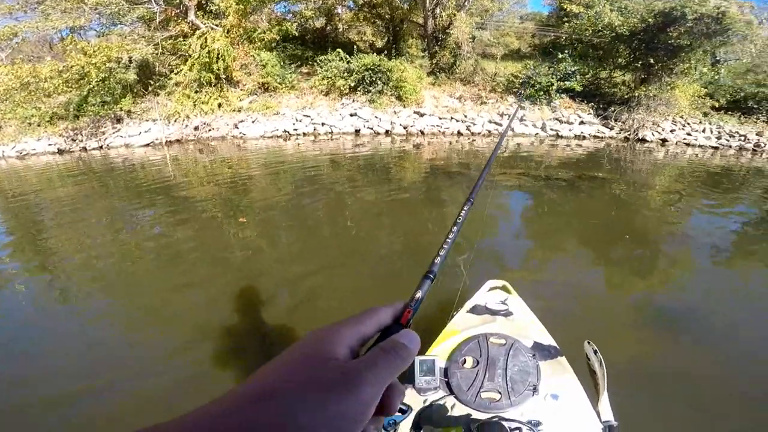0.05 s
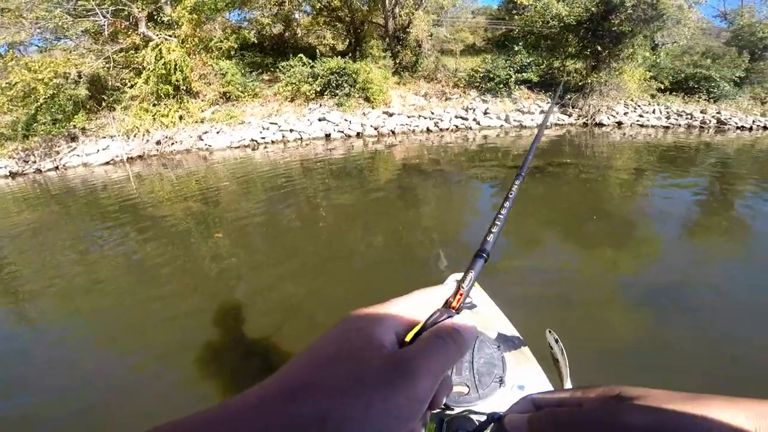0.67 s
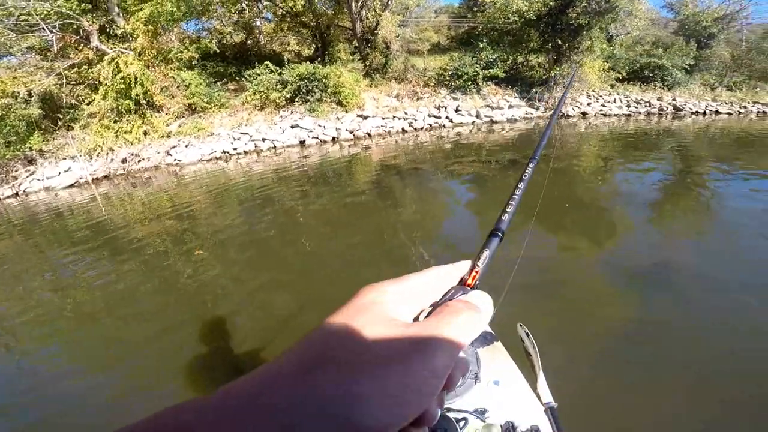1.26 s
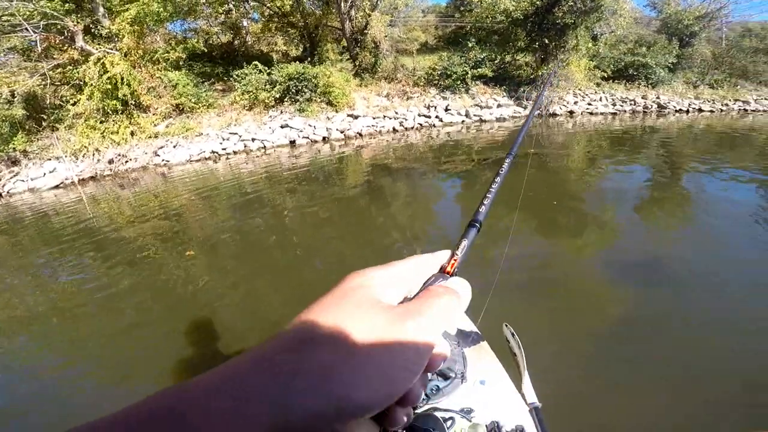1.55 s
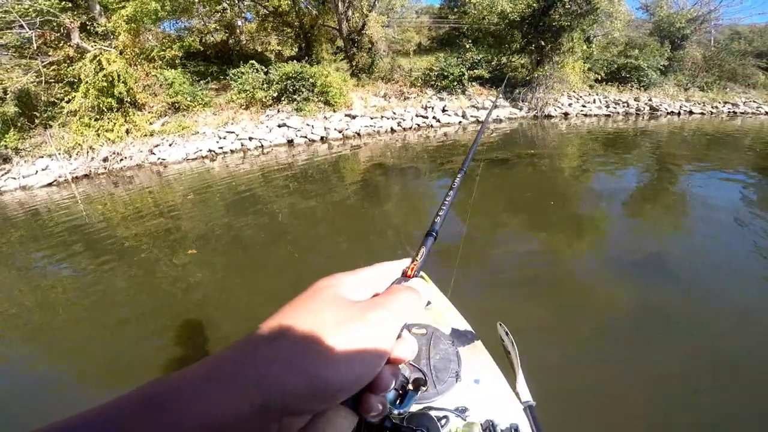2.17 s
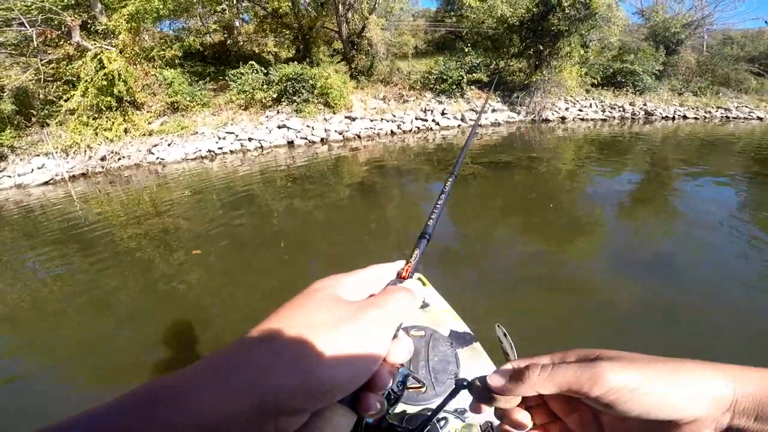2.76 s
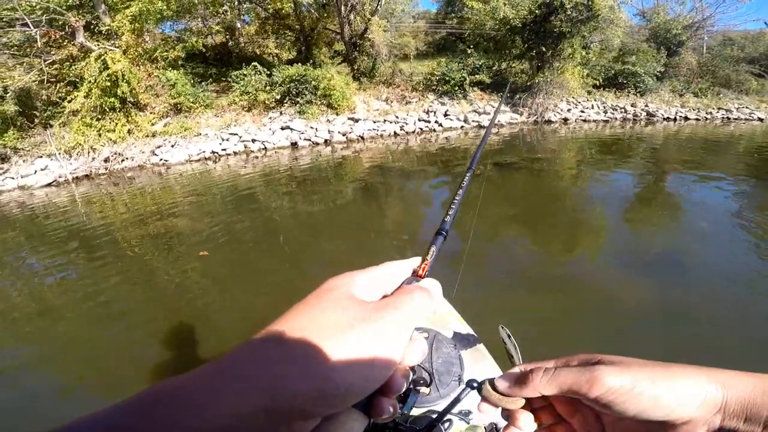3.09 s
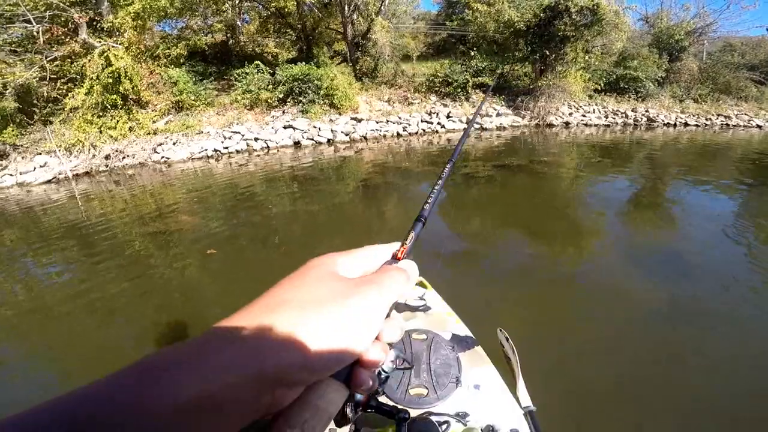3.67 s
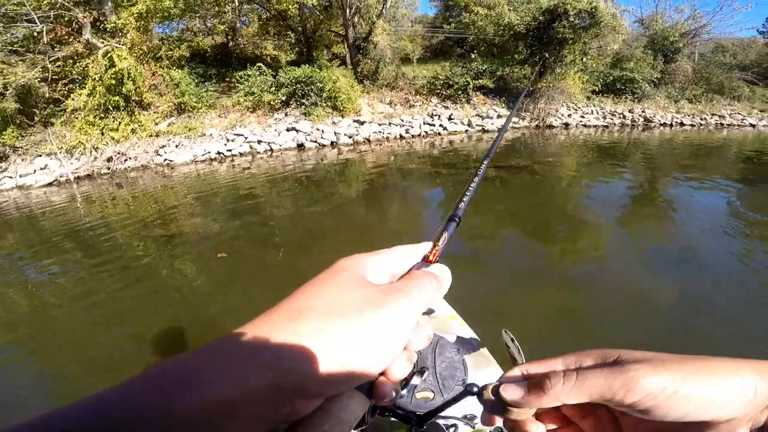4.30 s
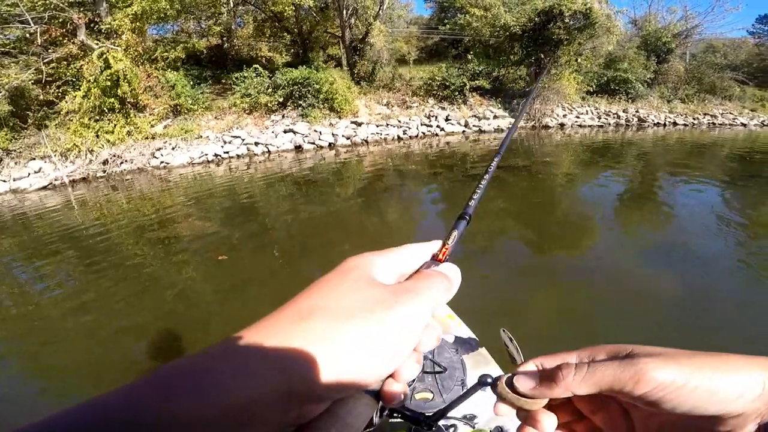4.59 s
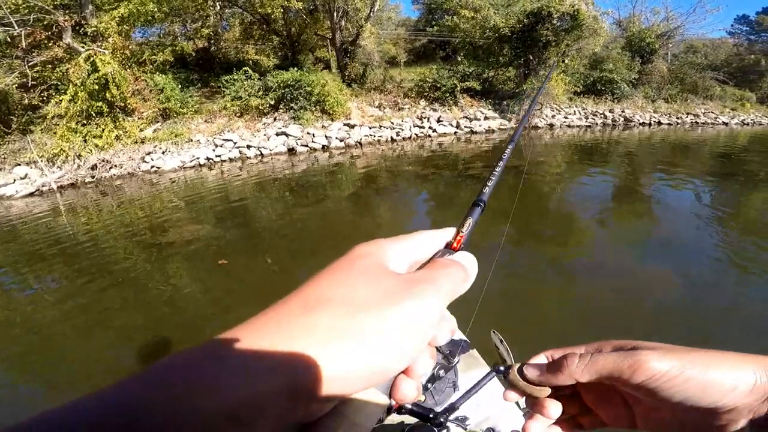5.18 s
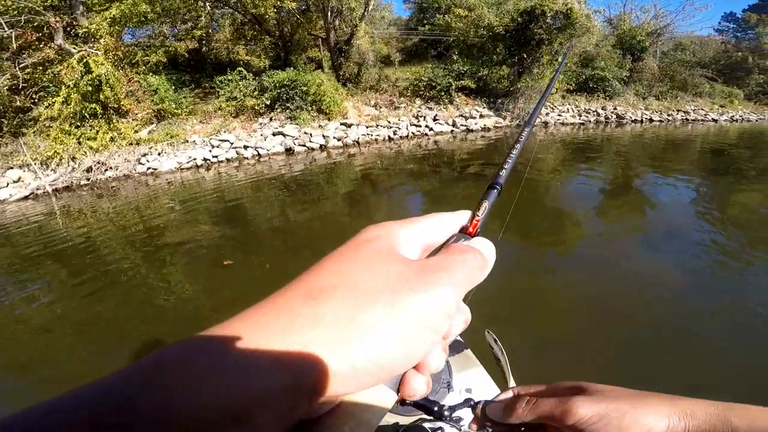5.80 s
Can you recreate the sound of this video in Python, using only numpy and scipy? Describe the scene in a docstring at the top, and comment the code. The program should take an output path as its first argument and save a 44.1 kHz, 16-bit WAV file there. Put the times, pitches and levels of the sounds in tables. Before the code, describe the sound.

Light wind rumbles on the microphone throughout, in small soft gusts, over a gentle wash of river water and leaves and a faint high hiss. A small electric motor hums low and close, with a faint wavering whine and a hollow drone from the kayak's plastic hull. The hum swells at about 0.5 seconds and holds until around 3, while the hull drone eases. The hum sinks to its weakest near 4.5 seconds and partly returns after 5. On the bank, faint crickets chirp and trill continuously in a high shimmer. A very faint katydid adds thin ticks and swelling buzzes that stop abruptly at about 0.7, 2.6 and 4.5 seconds, with another starting near 5.3. A fishing reel gives small dry clicks at the start, several between 1 and 2.5 seconds, two around 3.5 and one near 5.4. The whole scene stays quiet and calm.

```python
"""Kayak along a wooded bank

A small electric motor hums and whines faintly as its propeller wash shakes the kayak's hollow hull.
Light wind rumbles on the microphone over a soft wash of water and leaves. On the bank, wing strokes
make crickets chirp and trill and a meadow katydid tick and buzz. A fishing reel clicks now and then."""
import sys
import numpy as np
from scipy import signal
from scipy.fft import rfft, irfft
from scipy.io import wavfile
from scipy.ndimage import uniform_filter1d

SR = 44100
rng = np.random.default_rng(int(sys.argv[2]) if len(sys.argv) > 2 else 0)


def dump_mix(stems):
    """Bounce the given channels to the path in sys.argv[1] as a 16-bit WAV at rate SR."""
    frames = np.atleast_2d(stems).T  # one column per channel
    limited = np.clip(frames, -1, 1)  # hard clip at full scale
    pcm = np.round(limited * 32767).astype(np.int16)
    wavfile.write(sys.argv[1], SR, pcm)


N = 257984
T = np.arange(N) / SR


def undb(db):
    """Decibels to gain."""
    return 10 ** (np.asarray(db) / 20)


def unit(x):
    """Scale to an rms of one."""
    return x / np.sqrt(np.mean(x ** 2) + 1e-18)


def curve(points):
    """An automation line through (seconds, value) points."""
    times, values = np.transpose(points)
    return np.interp(T, times, values)


def shaped(gain_at):
    """Noise whose spectrum follows a gain function of frequency, at an rms of one."""
    hz = np.maximum(np.arange(N // 2 + 1) * SR / N, 1)
    return unit(irfft(rfft(rng.standard_normal(N)) * gain_at(hz), N))


def coloured(points):
    """Noise through an EQ curve of (Hz, dB) points."""
    hz, db = np.transpose(points)
    return shaped(lambda f: undb(np.interp(np.log(f), np.log(hz), db, left=-80, right=-80)))


def ringing(hz, width):
    """A steep resonance driven by noise."""
    def gain_at(f):
        detune = np.abs(f - hz) / (width / 2)
        return (1 + detune) / (1 + detune ** 2) ** 2
    return shaped(gain_at)


def walk(rate):
    """Smooth random drift with a spread of one, changing about rate times a second."""
    return shaped(lambda f: 1 / (1 + (f / rate) ** 2) ** 2)


def gate(start, end, rise, fall):
    """Open between two times, with sloping edges."""
    return np.clip((T - start) / rise, 0, 1) * np.clip((end - T) / fall, 0, 1)


def bump(offset, length):
    """A bell-shaped envelope that peaks where the offset is zero."""
    return np.exp(-2 * (offset / length) ** 2)


def strokes(rate, first, length, jitter_s=0.0024):
    """The envelope of rounded wing strokes at a nearly even rate."""
    turns = (T - first + jitter_s * walk(2.2)) * rate
    return bump((turns - np.round(turns)) / rate, length)


def outdoor_wash(low_db=-46.5, rise_db=4, flicker_db=0.4):
    """Water, leaves and distance blur together: the lows swell once and stay, the mids flicker."""
    # EQ of the wash's low and middle layers. Each row: frequency in Hz, relative level in dB.
    low_colour = [(40, -20), (80, 1.5), (125, -1.5), (160, -7), (280, -9), (400, -24.5), (800, -18.5)]
    mid_colour = [(150, 0), (300, -0.5), (550, 0), (670, -2), (820, 0), (1100, -2.5), (1550, -7),
                  (2000, -13.5), (2800, -20.5), (4500, -33.5), (9000, -32)]
    # Level ride of the middle layer. Each row: time in seconds, level in dB.
    mid_level = [(1.2, -43.5), (2.4, -45.5), (3.4, -44.5), (4.9, -45.5)]
    swell = np.clip((T - 1.2) / 1.9, 0, 1)
    lows = coloured(low_colour) * undb(low_db + rise_db * swell)
    mids = coloured(mid_colour) * undb(curve(mid_level) + flicker_db * walk(11))
    return lows + mids


def far_tones():
    """Faint, narrow bands of noise come and go in the distance."""
    # Each row: start and end in seconds, pitch and bandwidth in Hz, level in dB.
    tones = [(-.2, 1.3, 487, 9, -57.5), (0, 1.76, 533, 28, -57), (.2, 3.4, 591, 38, -57.5),
             (.2, 1.67, 850, 27, -58.5), (3.5, 3.9, 123.4, 6, -50), (3.9, 4.9, 997, 13, -58.5),
             (4.25, 5.6, 186, 29, -49), (5.1, 5.86, 348.4, 12, -51.5), (5.1, 6.2, 311.4, 9.7, -56),
             (5.1, 7.5, 465, 45, -60)]
    return sum(ringing(hz, width) * undb(db) * gate(start, end, rise=0.082, fall=0.1)
               for start, end, hz, width, db in tones)


def hiss(level_db=-58, fade_db_per_s=0.28, flicker_db=0.72):
    """A high hiss flickers and slowly fades."""
    # EQ of the hiss. Each row: frequency in Hz, relative level in dB.
    colour = [(1500, -2), (3000, 0.5), (4800, 1), (8800, -6), (10800, -10.5), (13500, -12.5), (15200, -12)]
    return coloured(colour) * undb(level_db - fade_db_per_s * T + flicker_db * walk(20))


def insect_chorus(level_db=-56.5, flicker_db=0.5):
    """Far crickets merge into one shimmering band."""
    # EQ of the chorus. Each row: frequency in Hz, relative level in dB.
    colour = [(4900, -29), (5350, -6), (5750, -3), (6350, -0.5), (6700, -0.5), (7050, -1), (7300, -6),
              (7750, -8.5), (8300, -10), (8750, -28)]
    return coloured(colour) * undb(level_db + flicker_db * walk(25))


def near_crickets(scatter_db=1):
    """Wing strokes ring each cricket's harp; foliage smears the pitch."""
    # Each row: pitch and bandwidth in Hz, chirps per second, first chirp's peak in seconds,
    # chirp length in seconds, level in dB.
    singers = [ (5610, 160, 12.13, 0.052, 0.023, -70), (5777, 97, 14, 0.079, .028, -66),
               (6160, 94, 11.97, 0.081, 0.035, -67), (6630, 140, 13.7, 0.0097, 0.032, -67),
               (6970, 240, 41.5, 0.014, .011, -63.5), (6720, 160, 43, 0.013, .011, -71.5),
               (7510, 210, 5.0, 0.11, 0.06, -70.5), (7990, 270, 5.45, 0.076, 0.032, -73.5),
               (8280, 230, 39, 0.0087, 0.0093, -76)]
    out = np.zeros(N)
    for hz, width, rate, first, length, db in singers:
        song = ringing(hz, width) * strokes(rate, first, length)
        out += unit(song) * undb(db + scatter_db * walk(2.7))
    return out


def tree_crickets():
    """Lower chirps, each a run of wing pulses, fade as the boat leaves them behind."""
    # Each row: pitch and bandwidth in Hz, chirps per second, first chirp's peak in seconds,
    # chirp length in seconds, pulses per second, opening level in dB, fade in dB per second.
    singers = [ (3638, 230, 2.61, 0.24, 0.12, 41.3, -68.5, 0.4),
               (3418, 200, 2.63, 0.23, 0.43, 42.3, -64, 1.0), (3153, 280, 2.4, 0.24, 0.29, 38.2, -66, 0.5)]
    out = np.zeros(N)
    for hz, width, rate, first, length, pulse_rate, db, fade in singers:
        chirps = strokes(rate, first, length, jitter_s=0.03)
        pulses = strokes(pulse_rate, first=0, length=0.013, jitter_s=0.0042)
        out += unit(ringing(hz, width) * chirps * pulses) * undb(db - fade * T)
    return out


def katydid(stroke_hz=55.5, swell_s=0.91, tick_db=-68, tick_s=0.01):
    """Scraping wings give a few dry ticks, then a fast buzz that swells and stops dead."""
    # The buzzes. Each row: start and end in seconds, level in dB that the swell heads for.
    buzzes = [(-.3, .67, -72), (1.7, 2.597, -71), (3.68, 4.46, -68.5), (5.301, 6.096, -71)]
    # The ticks that lead into a buzz. Each entry: time in seconds.
    tick_times = [1.50, 1.58, 1.67, 3.44, 3.503, 3.57, 5.115, 5.185, 5.25]
    # Resonances of the wing. Each row: frequency in Hz, relative level in dB.
    wing_colour = [(11000, -22), (12050, -11), (12290, 1), (12550, -12), (12770, -3), (13050, -10),
                   (13950, -13), (14800, -25)]
    swells = sum(undb(db) * gate(start, end, swell_s, fall=0.009) ** 0.33 for start, end, db in buzzes)
    ticks = sum(bump(T - at, tick_s) for at in tick_times)
    scrape = coloured(wing_colour)
    buzz = swells * unit(strokes(stroke_hz, first=0, length=0.0093))
    return scrape * (buzz + undb(tick_db) * ticks)


def reel():
    """Small dry clicks from the reel and the rod in the hand: sharp attacks, quick decays."""
    # Each row: start in seconds, level in dB, decay time in seconds.
    clicks = [(.110, -55, .008), (.925, -61, .008), (1.139, -56, .025), (1.2, -60, .02), (1.396, -61, .006),
              (1.668, -57, .005), (2.125, -59, .006), (2.261, -63, 0.007), (2.47, -57, .015),
              (2.53, -59, .008), (3.364, -53, .006), (3.561, -55, 0.0081), (5.373, -56, 0.013)]
    # EQ of the clicks. Each row: frequency in Hz, relative level in dB.
    colour = [(1000, -13), (3300, 3), (6000, 4), (9500, 2), (15000, -13)]
    envelope = sum(undb(db) * (T >= at) * np.exp(-np.abs(T - at) / decay) for at, db, decay in clicks)
    return coloured(colour) * envelope


def wind(breeze_db=-28.5, steadiness=0.59):
    """Slow eddies press on the microphone; each gust swells and falls back to the breeze."""
    # EQ of the rumble. Each row: frequency in Hz, relative level in dB.
    colour = [(3, -7.5), (9, -0.5), (17, -2), (28, -9.5), (45, -16), (80, -27.5), (150, -39.5),
              (400, -60.5)]
    # The gusts. Each row: peak time in seconds, length in seconds, rise above the breeze in dB.
    gusts = [(.2, 0.38, 4), (0.63, 0.077, 9.5), (.83, 0.091, 9), (1.214, 0.19, 3.5), (2.36, 0.24, 5),
             (3.72, 0.19, 5), (4.353, 0.14, 6), (4.74, .14, 5), (5.616, 0.31, 6)]
    eddies = coloured(colour)
    local_power = uniform_filter1d(eddies ** 2, size=SR // 7) + 1e-9
    breeze = unit(eddies / local_power ** (steadiness / 2))  # partly evens out the random surges
    gust_db = sum(db * bump(T - at, length) for at, length, db in gusts)
    return breeze * undb(breeze_db + gust_db)


def hull():
    """Propeller wash shakes the hollow plastic hull; the drone dies down and partly returns."""
    # Hull resonances. Each row: frequency and bandwidth in Hz, relative level in dB.
    modes = [(182.8, 17.5, 0.5), (205, 26, 0.5), (222.5, 8.9, -2), (243.6, 18, -3.5), (275, 39, -11.5)]
    # Level ride of the drone. Each row: time in seconds, level in dB.
    drone_level = [(.7, -44), (2.4, -53), (4.3, -50), (5.85, -52)]
    drone = sum(undb(db) * ringing(hz, width) for hz, width, db in modes)
    return unit(drone) * undb(curve(drone_level))


def motor(shaft_hz=60.4, sag_hz_per_s=0.23, wobble=0.00802, flutter_db=2, whine_order=12, rasp=0.69):
    """The shaft hums at its slowly sagging turning rate; the commutator whines at a multiple of it."""
    # Partials of the hum. Each row: multiple of the shaft rate, relative level in dB.
    partials = [(1, -1.5), (2, -22), (3, -27)]
    # How strongly the hum comes through the hull. Each row: time in seconds, gain in dB.
    hum_level = [(0, -44), (.55, -35), (2.1, -37), (3.15, -40.5), (4.5, -53), (5.3, -46), (5.85, -46)]
    hum_db = curve(hum_level)
    usual_hum_db, whine_below_db, whine_follows = -38, 18.5, 0.42
    # the whine sits under the hum and follows only a share of its swell
    whine_db = usual_hum_db - whine_below_db + whine_follows * (hum_db - usual_hum_db)
    # the water's load on the propeller makes the speed waver
    speed_hz = (shaft_hz - sag_hz_per_s * T) * (1 + wobble * walk(12.6))
    phase = 2 * np.pi * np.cumsum(speed_hz) / SR
    hum = np.zeros(N)
    for order, db in partials:
        amplitude = np.sqrt(2) * undb(db + flutter_db * walk(17))
        hum += amplitude * np.sin(order * phase + rng.uniform(0, 2 * np.pi))
    # uneven brush contact roughens the whine in level and phase
    whine = np.sin(whine_order * phase) * (1 + rasp * walk(28))
    whine += np.cos(whine_order * phase) * rasp * walk(28)
    return hum * undb(hum_db) + unit(whine) * undb(whine_db)


def scene():
    """Boat, air and river bank, mixed in mono."""
    boat = motor() + hull()
    air = wind() + outdoor_wash() + far_tones() + hiss()
    insects = insect_chorus() + near_crickets() + tree_crickets() + katydid()
    return (boat + air + insects + reel())[None]


def record(dry):
    """A steep low-pass takes off the very top."""
    top_hz = 15250
    low_pass = signal.ellip(12, 0.05, 60, top_hz, fs=SR, output="sos")
    return signal.sosfiltfilt(low_pass, dry)


dry = scene()
out = record(dry)
dump_mix(out)
```